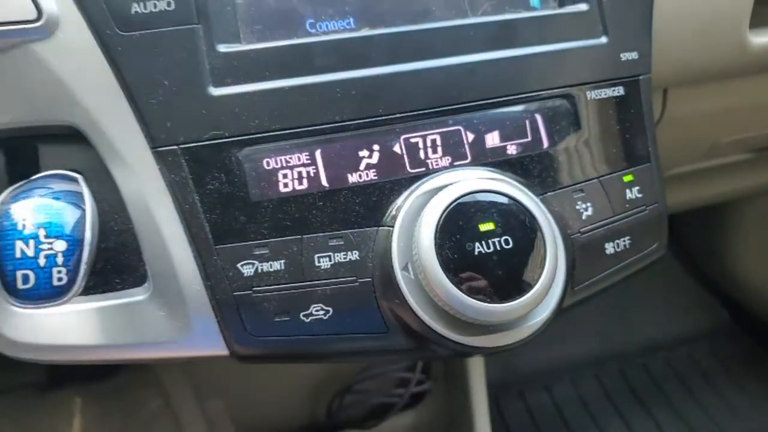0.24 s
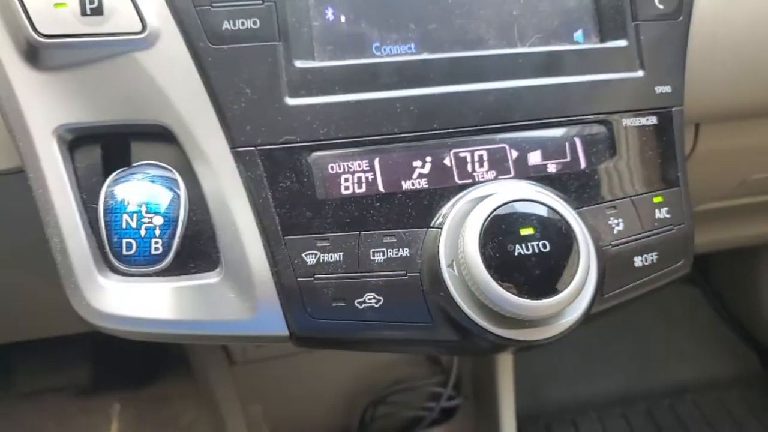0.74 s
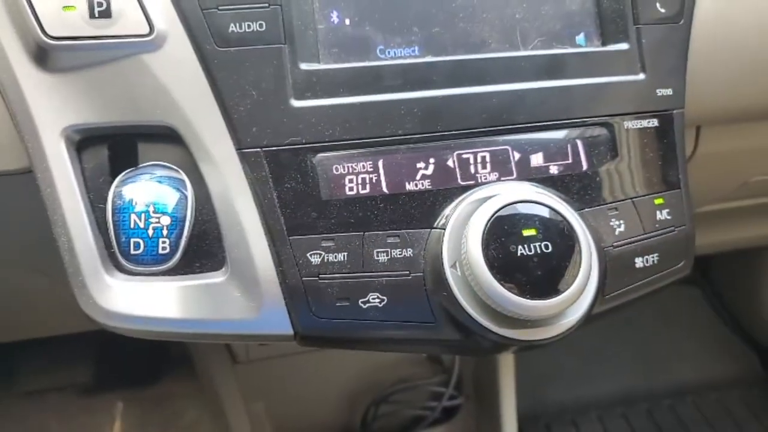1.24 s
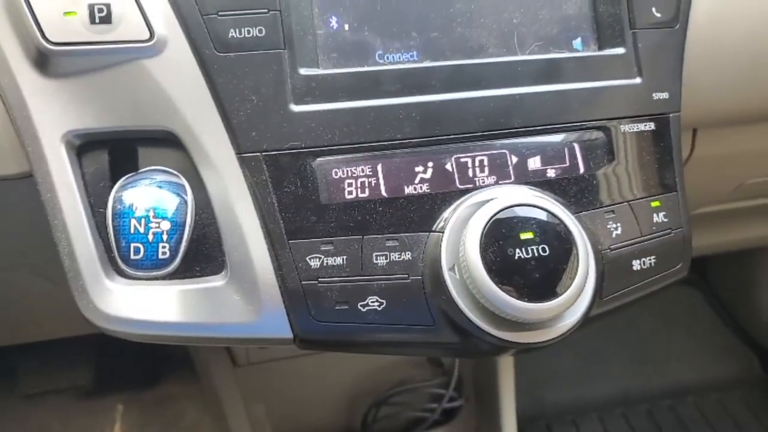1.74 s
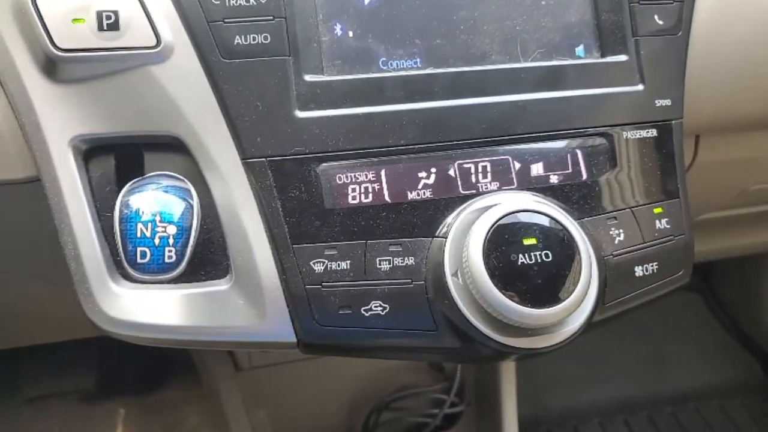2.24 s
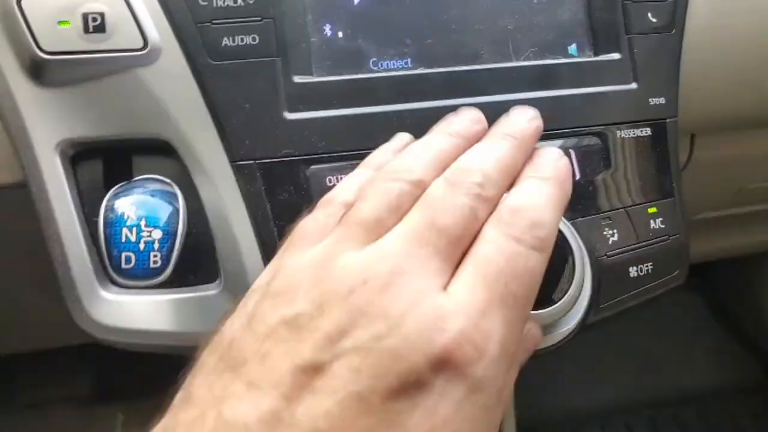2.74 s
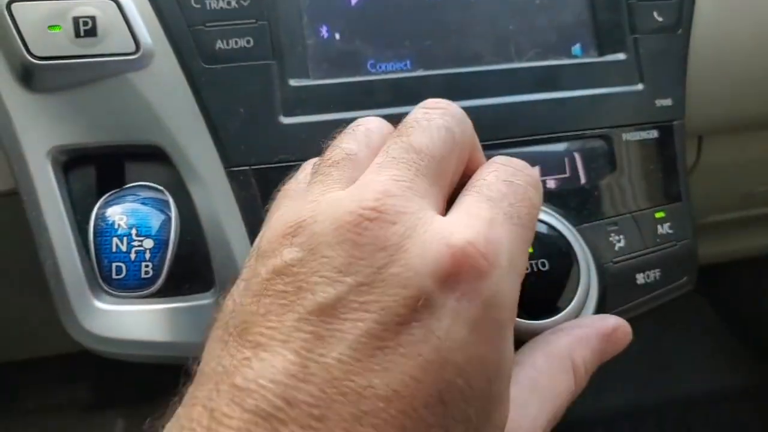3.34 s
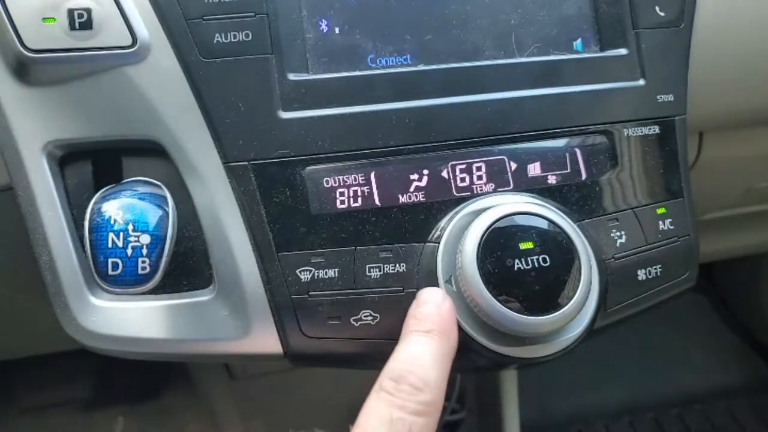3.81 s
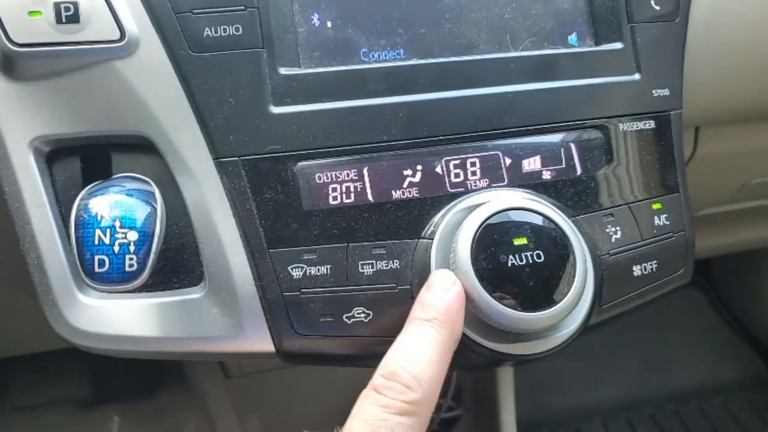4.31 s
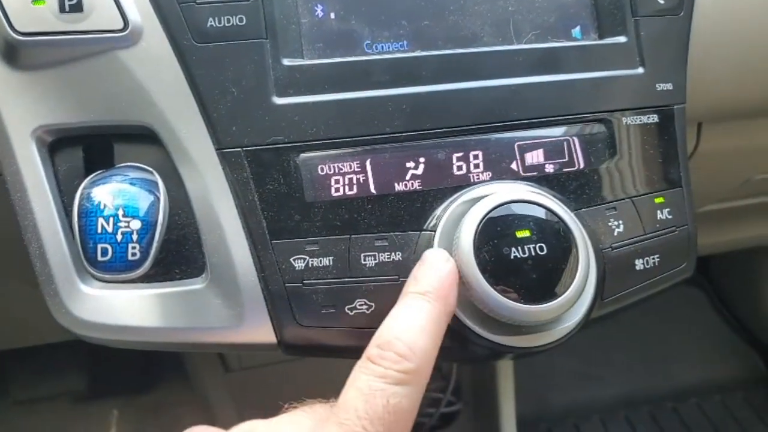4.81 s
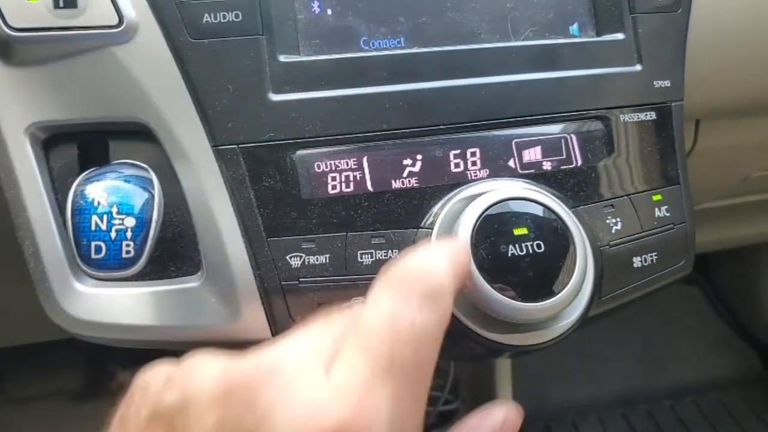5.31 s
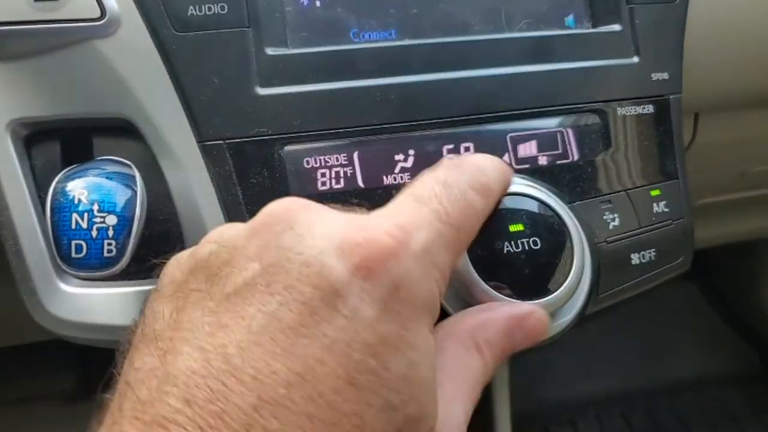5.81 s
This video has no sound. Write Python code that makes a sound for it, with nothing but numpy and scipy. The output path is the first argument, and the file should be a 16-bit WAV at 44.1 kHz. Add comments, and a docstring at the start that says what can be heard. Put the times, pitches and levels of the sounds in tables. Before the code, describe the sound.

A handheld stereo microphone near the dashboard hears a low throbbing idle dominating a muffled cabin. Fan hum and duct air stay quiet at first, with faint cloth swishes and one dry tick. Around the middle a hand clicks a dial twice; the fan then gradually quickens and hisses more, amid button clicks and knocks, ending with two rapid dial clicks.

```python
"""Idling in a parked car

The engine booms in the cabin as a firing tone with weaker overtones, and the heater blower adds hum and filtered noise.
Early on, a finger taps a hard case. A hand turns the climate knob down two detents, works the buttons
and turns the knob up two detents: each click is a burst of noise and a ring of plastic.
The blower speeds up after the first turn; swelling noise makes the sleeve rustle and a fingertip rasp.
A faint electronic whine and a faint steady hiss lie underneath."""
import sys
import numpy as np
from scipy import signal
from scipy.fft import rfft, irfft, next_fast_len
from scipy.io import wavfile
from scipy.ndimage import map_coordinates

SR = 44100
rng = np.random.default_rng(int(sys.argv[2]) if len(sys.argv) > 2 else 0)


def master(y):
    """Save y as 16-bit WAV."""
    cut = np.clip(np.atleast_2d(y).T, -1, 1)
    pcm = np.round(cut * 32767)  # scale
    wavfile.write(sys.argv[1], SR, pcm.astype(np.int16))


N = 266937  # length in samples

# how far most noises lean to one side: f/Hz, left minus right/dB
LEAN = [(800, -0.5), (1800, -1), (3300, -5.5), (6500, -11.5), (11000, -6), (15000, 4.5)]
BRIGHT_HZ = 8450  # a rub's or click's brightness acts above this
TOP_HZ = 15900  # nothing is kept from here up


def amp(db):
    """Turn decibels into gain."""
    return 10 ** (np.asarray(db) / 20)


def unit(x):
    """Scale to rms 1."""
    return x / np.sqrt(np.mean(x ** 2) + 1e-20)


def along(points, hz):
    """Read a curve of (Hz, value) points on a log frequency axis."""
    f, value = np.transpose(points)
    return np.interp(np.log(hz + 1), np.log(f + 1), value)


def curves(rows):
    """One value per sample for each column after the time."""
    s, *columns = np.transpose(rows)
    return [np.interp(np.arange(N) / SR, s, column) for column in columns]


def wobble(rate):
    """A smooth random curve around 0 through random knots, rate of them a second."""
    knots = rng.standard_normal(int(N * rate / SR) + 4)
    return map_coordinates(knots, [np.arange(N) * rate / SR])


def filtered(x, response):
    """Filter x by a complex response of frequency; the padding keeps the end off the start."""
    m = next_fast_len(N + SR // 2)
    hz = np.fft.rfftfreq(m, 1 / SR)
    return irfft(rfft(x, m) * response(hz), m)[..., :N]


def colour(spectrum):
    """Response of mean power 1 through (Hz, dB) points."""
    return lambda hz: unit(amp(along(spectrum, hz)))


def body(modes):
    """Causal response of mean power 1 from (Hz, width Hz, dB) resonances with alternating signs."""
    def response(f):
        h = 0
        for k, (centre, width, db) in enumerate(modes):
            damping = 1j * f * width
            h = h + (-1) ** k * amp(db) * damping / (centre * centre - f * f + damping)
        return h / np.sqrt(np.mean(np.abs(h) ** 2))
    return response


def cabin_noise(lean):
    """White stereo noise as the cabin mixes it: alike in the bass, unrelated and off-centre in the treble."""
    # how alike left and right are: f/Hz, likeness (1 = the same, 0 = unrelated)
    alike = [(40, 1), (75, .92), (130, .89), (300, .8), (800, .8), (1200, 0), (3000, 0)]

    def share(hz):
        turn = np.arccos(np.clip(along(alike, hz), -1, 1)) / 2
        return np.array([np.cos(turn), np.sin(turn)])

    def pan(hz):
        gains = amp(np.outer([.5, -.5], along(lean, hz)))
        return gains / np.sqrt(np.mean(gains ** 2, axis=0))

    mid, side = filtered(rng.standard_normal((2, N)), share)
    return filtered(np.array([mid + side, mid - side]), pan)


def bursts(rows, chatter, t60, tail_db, tail_t60):
    """Envelope of contacts (times in s): the parts chatter briefly, settle, and the cabin answers."""
    t, power = np.arange(N) / SR, np.zeros(N)
    for s, db in rows:
        age = np.maximum(t - s, 0)
        contact = amp(-60 * np.maximum(age - chatter, 0) / t60)
        tail = amp(tail_db - 60 * age / tail_t60)
        power += (t >= s) * amp(db) ** 2 * (contact ** 2 + tail ** 2)
    return np.sqrt(power)


def snap(rows, db):
    """The first hard strike of each contact, a single sharp push."""
    push = np.zeros(N)
    for s, level in rows:
        push[round(s * SR)] = amp(level + db)
    return push


def stroke(s, length):
    """A movement swells to its peak at s and fades alike; length is its time above half power."""
    shape = 1.8  # 1 = pointed, 2 = rounded swell
    return 2 ** (-.5 * np.abs(2 * (np.arange(N) / SR - s) / length) ** shape)


def split_treble(x):
    """The parts of x below and above BRIGHT_HZ."""
    dull = filtered(x, lambda hz: 1 / (1 + (hz / BRIGHT_HZ) ** 8))
    return dull, x - dull


def ring(s, modes, lean, attack, scatter_db):
    """Plastic struck at s: (Hz, t60 s, dB) modes build up quickly and die, each at a slightly random level."""
    t, out = np.arange(SR // 8) / SR, np.zeros((2, N + SR))
    start = round(s * SR)
    for hz, t60, db in modes:
        pair = amp(along(lean, hz) * np.array([[.5], [-.5]]))  # left and right gains
        phase = rng.uniform(0, 2 * np.pi, (2, 1))
        wave = np.sqrt(2) * unit(pair) * np.sin(2 * np.pi * hz * t + phase)
        decay = amp(db + scatter_db * rng.standard_normal() - 60 * t / t60)
        out[:, start:start + len(t)] += decay * (1 - np.exp(-t / attack)) * wave
    return out[:, :N]


def cabin_answer(x):
    """Windscreen and trim throw a click back as a short, dense tail."""
    delay_s, t60_s, level_db = 0.009, 0.056, -11.5
    t = np.arange(SR // 6) / SR
    tail = rng.standard_normal((2, len(t))) * amp(-60 * t / t60_s) * (t > delay_s)
    tail = tail / np.linalg.norm(tail[0])
    return amp(level_db) * signal.fftconvolve(x, tail, axes=1)[:, :N]


def engine():
    """The firing rate booms steadily in the cabin, hunting a little; its overtones waver."""
    # overtones, after the firing tone itself: multiple of the firing rate, level before a trim/dB
    firing = [(1, 0), (2, -22.5), (3, -27.5), (4, -35), (6, -31), (7, -29), (9, -34)]
    idle_hz, idle_db = 43.42, -22  # firing rate and its level
    hunt_hz, drift_db, flutter_db = 0.1356, 0.42, 0.55  # how far pitch and level stray
    phase = 2 * np.pi * np.cumsum(idle_hz + hunt_hz * wobble(5)) / SR
    boom = amp(flutter_db * wobble(12)) * np.sin(phase)
    for order, level in firing[1:]:
        gain = amp(level - 1.5 + 2.2 * wobble(7))
        stray = 0.39 * wobble(7.3) + rng.uniform(0, 2 * np.pi)
        boom += gain * np.sin(round(order) * phase + stray)
    sides = amp([[.15], [-.15]])  # left a touch louder
    return np.sqrt(2) * amp(idle_db + drift_db * wobble(1.6)) * boom * sides


def blower():
    """Faster turning raises the motor hum, the rumble and roar in the ducts and, most of all, the vent hiss."""
    # motor: t/s, hum f/Hz
    motor = [(0, 274.8), (3.6, 278.2), (4.2, 289), (4.8, 311), (5.4, 324.4), (6.05, 328.8)]
    # spectra of duct rumble, duct roar and vent hiss: f/Hz, relative level per Hz/dB
    rumble_spectrum = [(15, -16.5), (30, -2.5), (60, -3.5), (85, 1), (128, -3), (150, -11), (190, -22.5),
                       (400, -36.5), (1000, -83)]
    roar_spectrum = [(120, -4.5), (200, -0.5), (270, 1), (320, -2), (370, -6), (490, -9), (610, -7.5),
                     (680, -10), (810, -7.5), (1100, -14.5), (1600, -20), (1900, -23.5), (2150, -33.5),
                     (2600, -39), (5000, -76.5)]
    hiss_spectrum = [(700, -22.5), (1700, -2.5), (2050, 2), (2300, 5.5), (2550, 0), (2900, 2), (3300, 2),
                     (3600, -2), (3800, -3.5), (4300, -4), (5100, -9.5), (5700, -7), (7000, -20),
                     (8500, -20.5), (10000, -26), (11000, -16.5), (13500, -25), (16000, -9)]
    # air resonating at the vent grilles: f/Hz, width/Hz, relative level/dB
    grille = [(614, 28, 4), (759, 64, 4), (800, 140, -3), (1090, 19, -14.5), (1540, 210, -9)]
    hum_hz, = curves(motor)
    speed_db = 20 * np.log10(hum_hz / hum_hz[0])  # 0 at the starting speed

    rumble_gain = amp(-40.0 + 1.6 * speed_db + 1.3 * wobble(9))
    rumble = rumble_gain * filtered(cabin_noise(LEAN), colour(rumble_spectrum))
    roar_gain = amp(-46.0 + 3.1 * speed_db + 1.48 * wobble(6.5))
    roar = roar_gain * filtered(cabin_noise(LEAN), colour(roar_spectrum))
    # the grilles start to sing as the air stream quickens
    rush = amp(-56.5 + 4.0 * speed_db) * filtered(cabin_noise(LEAN), body(grille))
    rush = filtered(rush, lambda hz: 1 / (1 + (hz / 1700) ** 4))
    hiss_gain = amp(-67.5 + 6.1 * speed_db + 0.96 * wobble(13.0))
    hiss = hiss_gain * filtered(cabin_noise(LEAN), colour(hiss_spectrum))
    hum_phase = 2 * np.pi * np.cumsum(hum_hz + 1.82 * wobble(9)) / SR
    hum = amp(-52.5 + 2.0 * speed_db + 1.5 * wobble(5.8)) * np.sin(hum_phase)
    return rumble + roar + rush + hiss + hum


def knob():
    """The detent spring snaps into each notch and rattles; each direction strikes the plastic at another spot."""
    # snaps: t/s, level before trims/dB, direction (0 down, 1 up)
    detents = [(3.2404, -25.5, 0), (3.3548, -25, 0), (5.8532, -24.5, 1), (5.9159, -23.5, 1)]
    # ringing plastic: f/Hz, t60/s, relative level turning down/dB, turning up/dB
    plastic = [(975, .024, -5.5, -5.5), (1130, .025, -13, -6), (1470, .02, -9, -15), (1780, .03, -19, -14),
               (1970, .025, -17, -12), (2790, .028, -24, -7), (3360, .08, -13, -26), (3390, .02, 5, 2.5),
               (3600, .025, -14, -8), (3830, .022, -16, -9), (4190, .024, -1, -14), (4325, .028, -3, -7),
               (4690, .026, -26, -9), (4865, .035, -7, -15), (5225, .03, -19, -12), (5600, .022, -6, -14),
               (5825, .03, -12, -20), (6045, .03, -19, -10), (6510, .04, -11, -20), (7480, .03, -14, -17),
               (8450, .03, -9, -20), (9000, .03, -17, -16), (9930, .024, -17, -11), (10400, .024, -12, -7),
               (11000, .025, -12, -5), (11330, .03, -10, -11), (12500, .03, -9, -16),
               (14300, .03, -16, -17), (15400, .03, -11, -15)]
    # spring's rattle: f/Hz, relative level per Hz turning down/dB, turning up/dB
    rattle_spectra = [(500, -11, -10), (900, -2, 4), (1400, 3.5, -1), (2300, -7, -4), (3380, 1, 11),
                      (4280, -6, -4), (5540, 0, 3), (8000, -8.5, -8), (10900, -1, 2), (15500, -6.5, -7)]
    # how far the knob leans to one side: f/Hz, left minus right/dB
    knob_lean = [(1000, -4), (2000, -0.5), (2800, -4.5), (3400, -6), (4250, -21), (4800, -6.5),
                 (5600, -14.5), (6600, -12.5), (8400, -2), (11000, -9), (13000, -9), (15000, 6.5)]
    direct = 0
    for s, db, direction in detents:
        way = round(direction)
        modes = [(hz, t60, db + levels[way]) for hz, t60, *levels in plastic]
        spring = colour([(hz, levels[way]) for hz, *levels in rattle_spectra])
        envelope = bursts([(s, db)], chatter=.004, t60=0.026, tail_db=-17, tail_t60=0.12)
        rattle = filtered(envelope * cabin_noise(knob_lean), spring)
        ringing = ring(s, modes, knob_lean, attack=0.0012, scatter_db=0.2)
        direct = direct + amp(1.2) * ringing + amp(-2.5) * rattle
    return direct + cabin_answer(direct)


def buttons():
    """Softer key clicks: a crisp rattle, a short ring of the plastic and a knock of the panel behind."""
    # presses, releases and finger touches, levels before filters and trims:
    # t/s, click/dB, extra treble/dB, panel knock/dB, plastic ring/dB
    presses = [(2.852, -45, -9.5, -52.5, -61), (2.962, -56, 3.5, -63, -50), (3.017, -52.5, 2.5, -69, -66),
               (3.317, -53.5, 6, -75, -47.5), (4.185, -58, 1.5, -54.5, -64), (4.529, -59.5, -1.5, -60, -53),
               (4.553, -40.5, 4, -54, -42), (4.567, -46.5, 8, -58, -55), (4.685, -45.5, 10, -55, -50),
               (4.694, -47.5, -1.5, -36, -38), (5.1066, -43.5, -4, -47, -43), (5.236, -44, 10.5, -63, -52),
               (5.2401, -41.5, 3.5, -36.5, -39.5), (5.843, -57, -2, -64, -47)]
    # click spectrum: f/Hz, relative level per Hz/dB
    click_spectrum = [(200, -9.5), (600, 3.5), (1000, 2.5), (1400, 4.5), (2300, -3), (3300, -2),
                      (4200, -5.5), (4800, -7.5), (6300, -7.5), (8000, -20), (10700, -11.5), (13500, -22),
                      (16000, -12)]
    # panel resonances: f/Hz, width/Hz, relative level/dB
    panel = [(302, 120, 0), (432, 130, -3), (537, 42, -3)]
    # ringing key plastic: f/Hz, t60/s, relative level/dB
    key = [(950, .03, 1), (1360, .025, -7), (1700, .025, -8), (2100, .04, -10), (3260, .035, -6),
           (3850, .02, -3), (4170, .025, -1), (4390, .03, -3.5), (5150, .03, -9), (7500, .03, -16)]
    dull, bright = split_treble(cabin_noise(LEAN))
    dull_hits = [(s, db) for s, db, *_ in presses]
    bright_hits = [(s, db + bright_db) for s, db, bright_db, *_ in presses]
    click = dull * bursts(dull_hits, chatter=0.0057, t60=0.064, tail_db=-7.5, tail_t60=0.16)
    click += bright * bursts(bright_hits, chatter=0.004, t60=0.043, tail_db=-7.5, tail_t60=0.11)

    knocks = [(s, db) for s, _, _, db, _ in presses]
    shake = bursts(knocks, chatter=0.007, t60=0.067, tail_db=-11.0, tail_t60=0.2)
    knock = snap(knocks, db=20.5) + shake * cabin_noise(LEAN)
    plastic = sum(amp(db) * ring(s, key, LEAN, attack=0.0015, scatter_db=2.8) for s, *_, db in presses)
    return filtered(click, colour(click_spectrum)) + filtered(knock, body(panel)) + plastic


def fingertip():
    """Skin sticks and slips along the rim of the knob with a thin, high rasp."""
    # brushes: t of the peak/s, length/s, level/dB
    brushes = [(3.982, 0.025, -64.5), (4.08, 0.07, -66), (4.886, 0.035, -70)]
    # rim resonances: f/Hz, width/Hz, relative level/dB
    rim = [(5600, 350, -2), (6050, 450, 0), (6800, 600, -9), (11000, 1000, -9)]
    pressure = sum(amp(db) * stroke(s, length) for s, length, db in brushes)
    slips = amp(2.5 * wobble(200))
    return filtered(pressure * slips * cabin_noise(LEAN), body(rim))


def clothing():
    """Fabric rubs in a soft, uneven swish with each arm stroke; one long stroke slides back over the seat."""
    # rubs of the sleeve: t of the peak/s, length/s, level/dB, extra treble/dB
    rubs = [(0.649, 0.068, -56.5, 1.5), (0.855, 0.12, -62.5, -7), (1.048, 0.059, -64.5, -3.5),
            (1.198, .12, -72.5, 3.5), (1.385, 0.033, -63.5, -3.5), (1.63, 0.05, -62.5, 4.5),
            (2.812, 0.22, -60, -4.5), (2.949, 0.065, -68, 4.5), (3.088, 0.055, -70, 7),
            (3.202, 0.016, -60.5, 1.5), (3.314, .04, -55, -4.5), (3.486, 0.034, -56.5, -3),
            (3.633, 0.05, -75.5, 16), (3.728, .13, -71.5, 6.5), (4.644, 0.014, -58, -4),
            (5.716, 0.039, -54.5, -4.5)]
    # spectra of sleeve and seat: f/Hz, relative level per Hz/dB
    cloth_spectrum = [(1000, -14), (3000, 0.5), (6500, -5.5), (8500, -10.5), (11500, -1.5), (14000, -6.5),
                      (16000, -6)]
    seat_spectrum = [(800, -17), (2000, -2), (3400, 0), (5500, -5.5), (8000, -10.5), (11500, -8.5),
                     (16000, -14)]
    catches_db = 2 * wobble(220)  # how unevenly the fabric catches
    dull, bright = split_treble(filtered(cabin_noise(LEAN), colour(cloth_spectrum)))
    rustle = 0
    for s, length, db, bright_db in rubs:
        rustle = rustle + amp(db) * stroke(s, length) * (dull + amp(bright_db) * bright)
    seat = filtered(cabin_noise([(4000, -4.5), (12000, -2.5)]), colour(seat_spectrum))
    slide = amp(-52.5 + .5 * catches_db) * stroke(s=.33, length=0.14) * seat
    return amp(catches_db) * rustle + slide


def tap():
    """A finger taps a hard case: a tiny dry tick, alike on both sides, and a dull thud follows at once."""
    # taps: t/s, level before trims/dB
    taps = [(0.5892, -37.5)]
    # resonances of the hard shell, then of the whole case giving way: f/Hz, width/Hz, relative level/dB
    shell = [(4000, 12000, -1.5), (10700, 5000, 2.5)]
    case = [(600, 1200, 0)]
    thud_delay_s, thud_top_hz = 0.00097, 2800  # lag behind the tick; the soft finger dulls the thud
    crackle = bursts(taps, chatter=.0006, t60=0.0059, tail_db=-17.5, tail_t60=0.032)
    tick = snap(taps, db=2) + crackle * amp(-3) * rng.standard_normal(N)
    thud = snap([(s + thud_delay_s, db) for s, db in taps], db=18.5)
    padded_thud = filtered(filtered(thud, body(case)), lambda hz: 1 / (1 + 1j * hz / thud_top_hz))
    return filtered(tick, body(shell)) + padded_thud


def whine(hz=15002, db=-77):
    """A faint electronic whine from the dashboard: one high sine whose level wavers."""
    return amp(db + 1.5 * wobble(4.9)) * np.sin(2 * np.pi * hz * np.arange(N) / SR)


def floor_hiss(db=-69.5):
    """A faint hiss of coloured noise that stays the same at any blower speed."""
    # hiss spectrum: f/Hz, relative level per Hz/dB
    floor_spectrum = [(1500, -18.5), (2600, -10), (2950, 0.5), (3500, 2), (3800, -13), (5500, -4.5),
                      (6600, -2.5), (8500, -13), (11000, -6), (13500, -10), (16000, -2)]
    return amp(db) * filtered(cabin_noise(LEAN), colour(floor_spectrum))


def scene():
    """Add up everything heard from the driver's seat."""
    machines = engine() + blower()
    hand = knob() + buttons() + fingertip() + clothing() + tap()
    return machines + hand + whine() + floor_hiss()


def record(dry):
    """Keep only what lies below TOP_HZ."""
    return filtered(dry, lambda hz: hz < TOP_HZ)


dry = scene()
out = record(dry)
master(out)
```